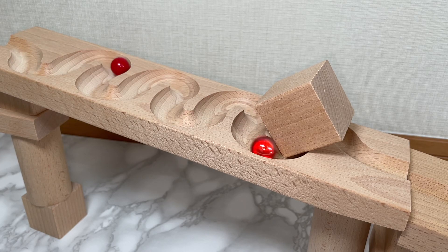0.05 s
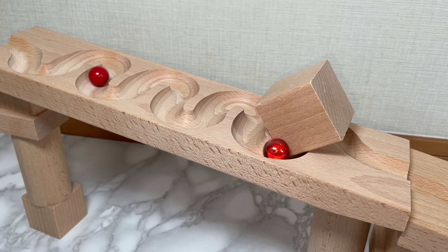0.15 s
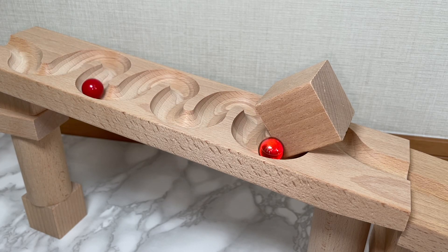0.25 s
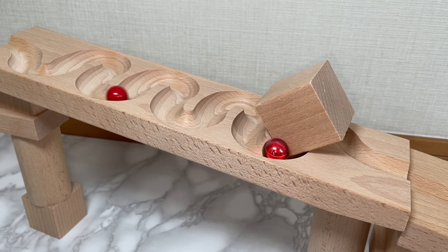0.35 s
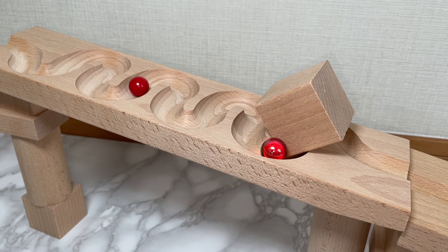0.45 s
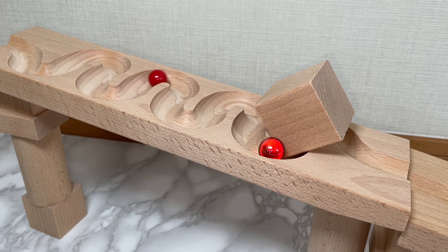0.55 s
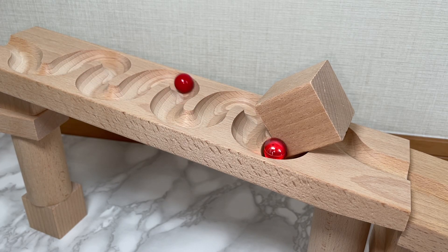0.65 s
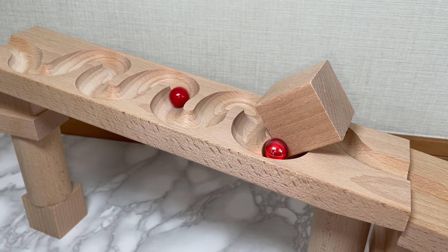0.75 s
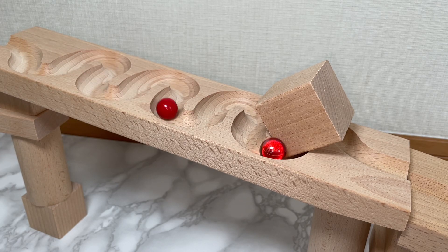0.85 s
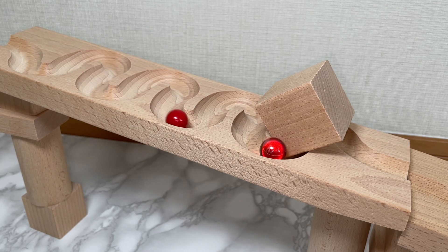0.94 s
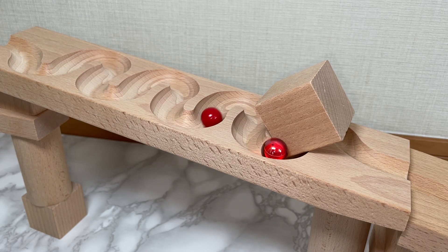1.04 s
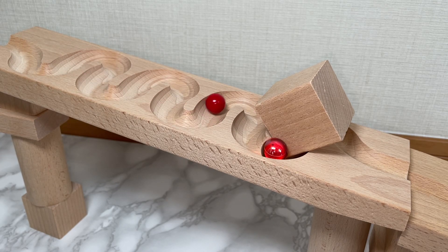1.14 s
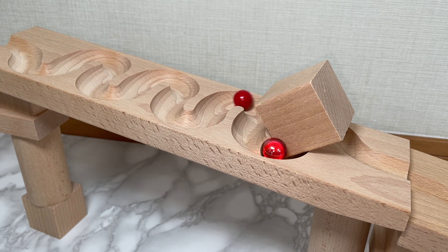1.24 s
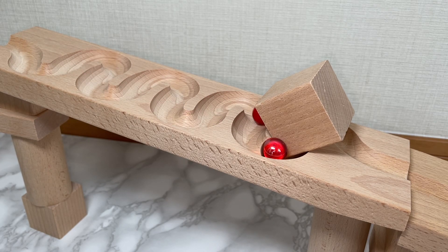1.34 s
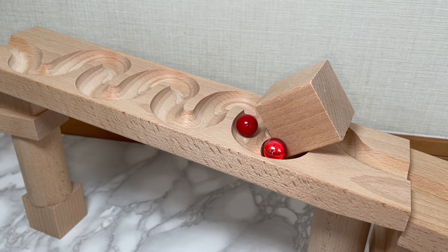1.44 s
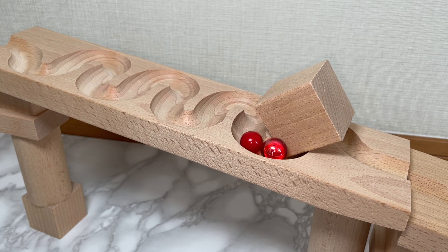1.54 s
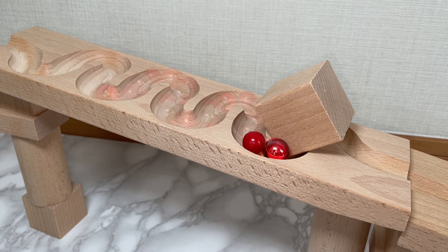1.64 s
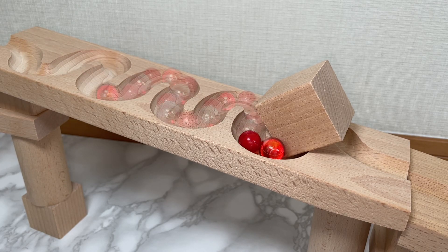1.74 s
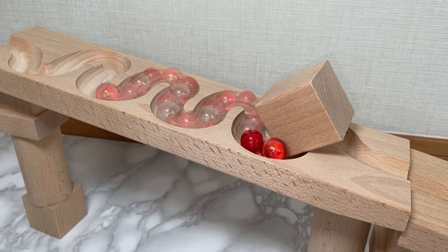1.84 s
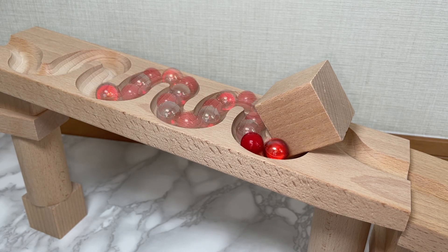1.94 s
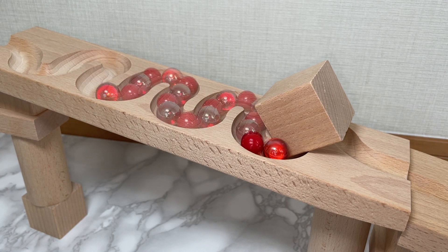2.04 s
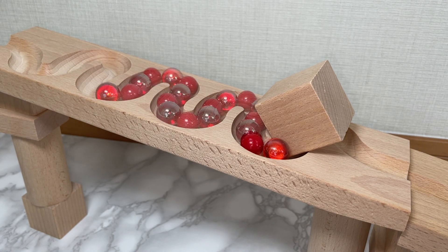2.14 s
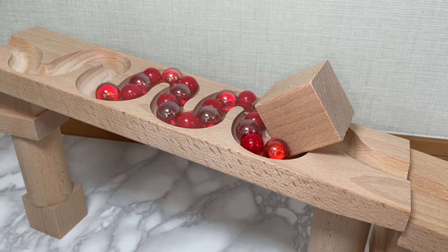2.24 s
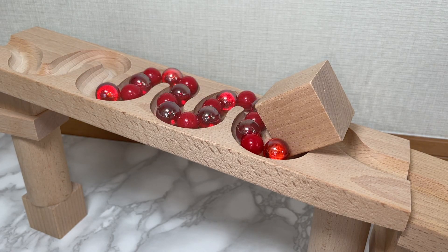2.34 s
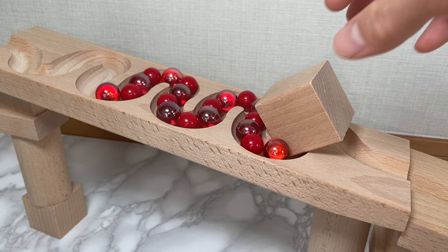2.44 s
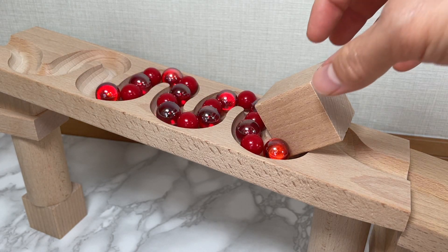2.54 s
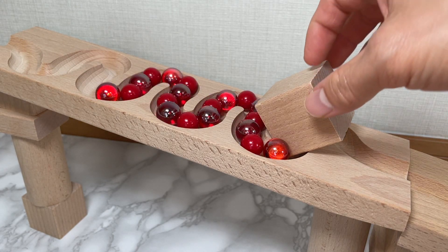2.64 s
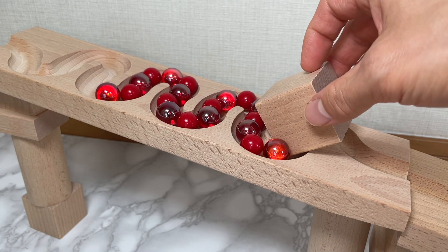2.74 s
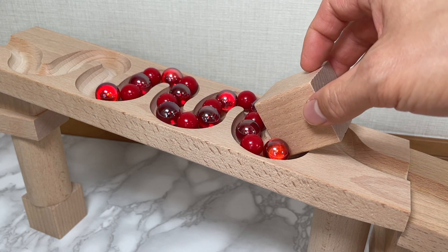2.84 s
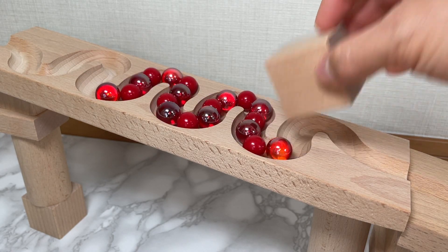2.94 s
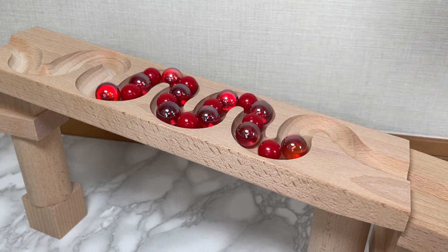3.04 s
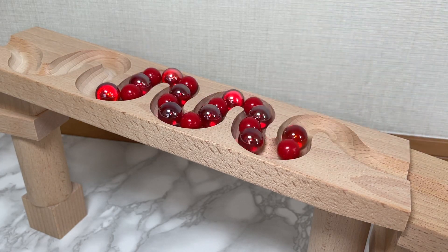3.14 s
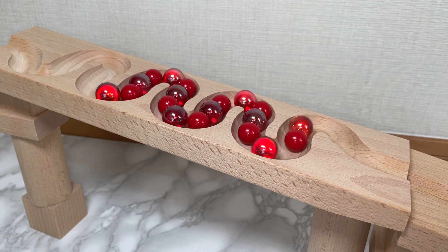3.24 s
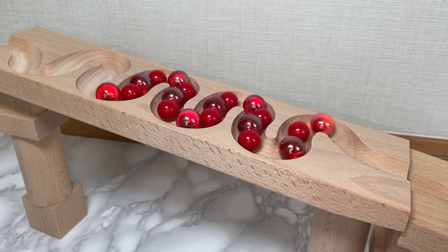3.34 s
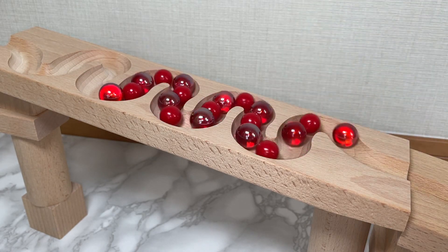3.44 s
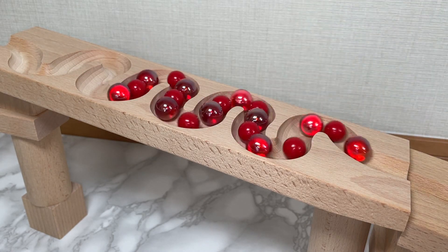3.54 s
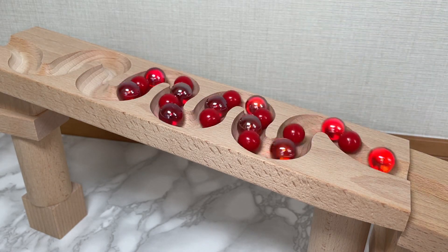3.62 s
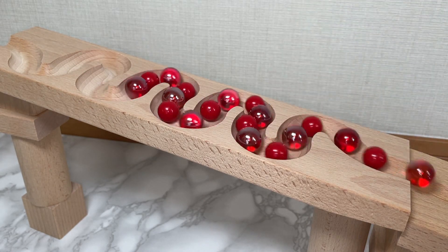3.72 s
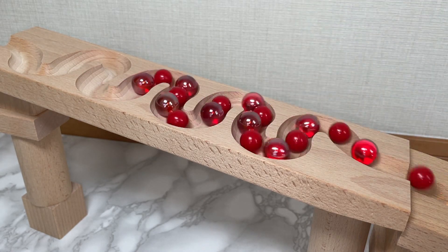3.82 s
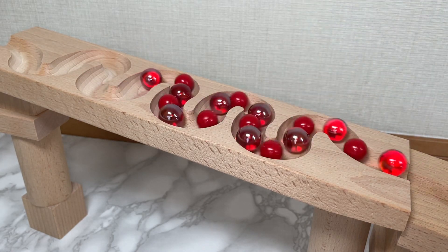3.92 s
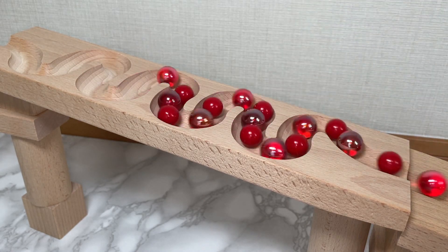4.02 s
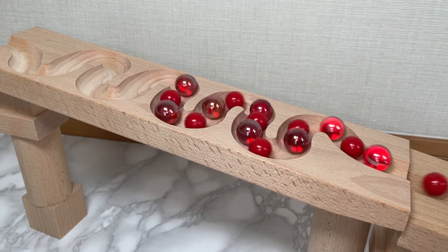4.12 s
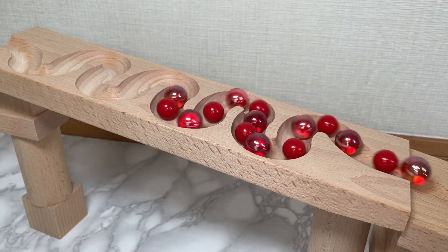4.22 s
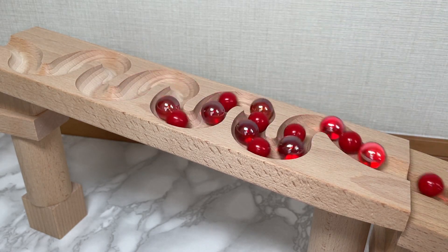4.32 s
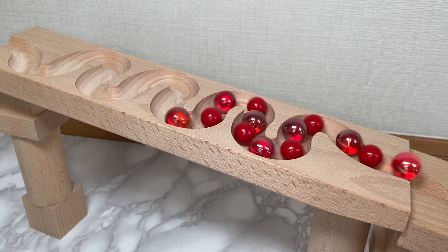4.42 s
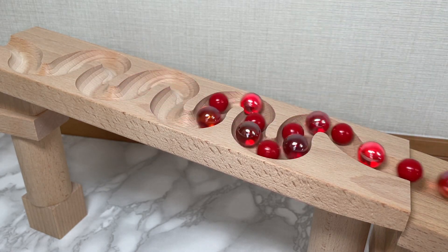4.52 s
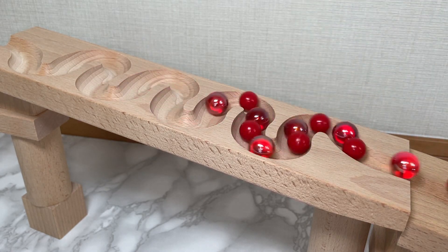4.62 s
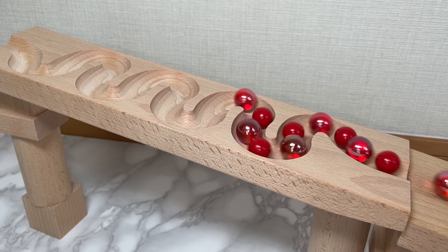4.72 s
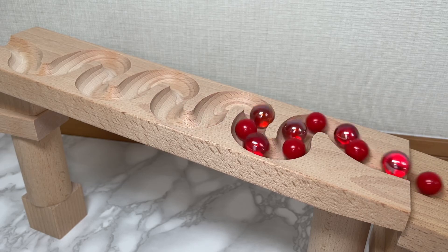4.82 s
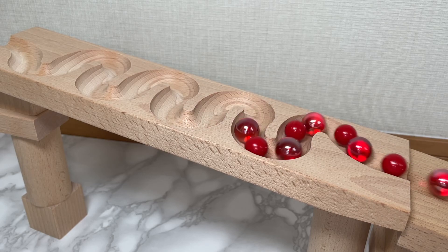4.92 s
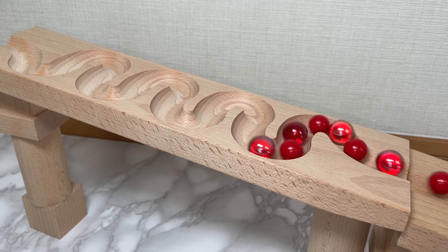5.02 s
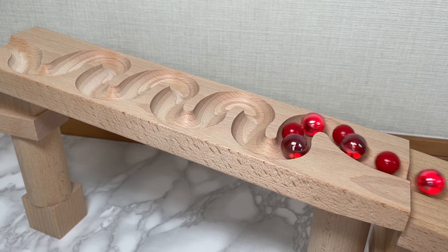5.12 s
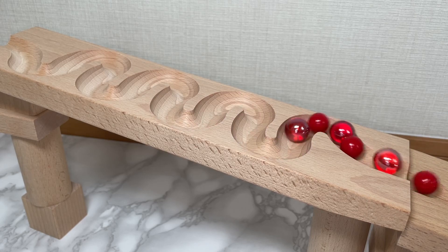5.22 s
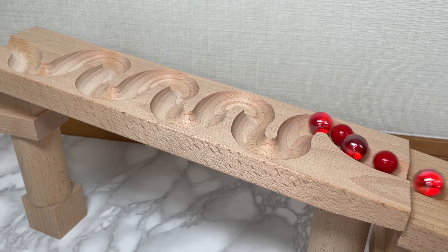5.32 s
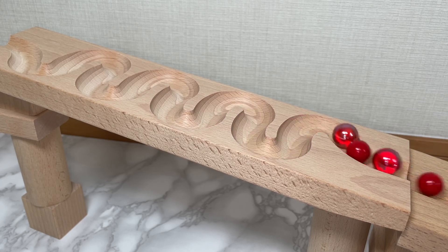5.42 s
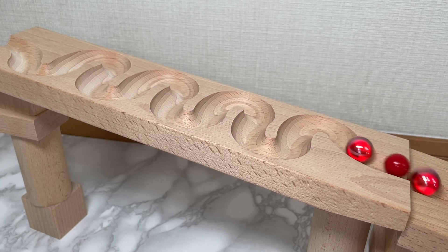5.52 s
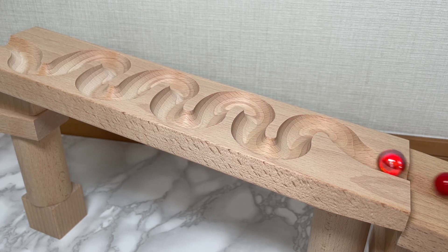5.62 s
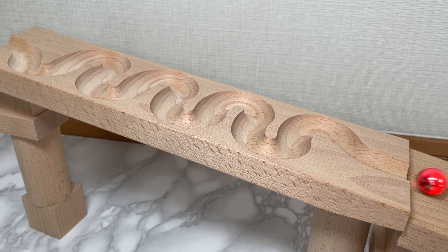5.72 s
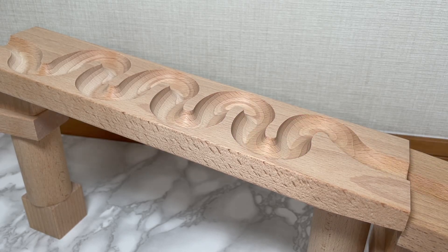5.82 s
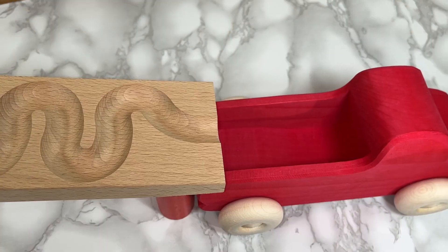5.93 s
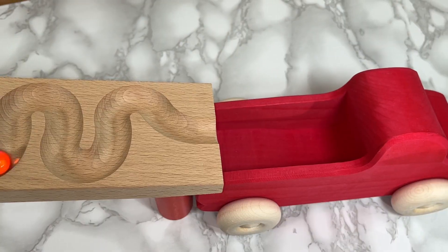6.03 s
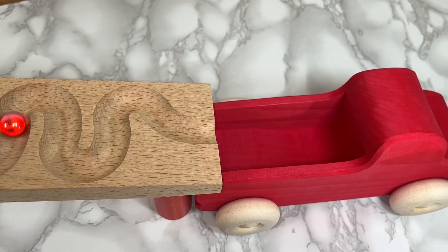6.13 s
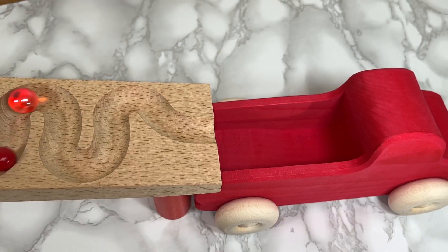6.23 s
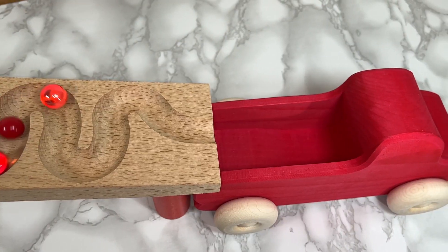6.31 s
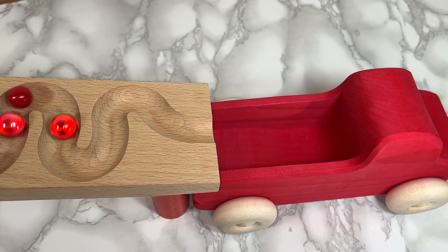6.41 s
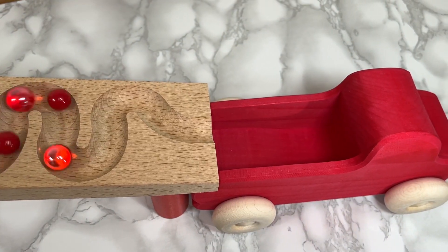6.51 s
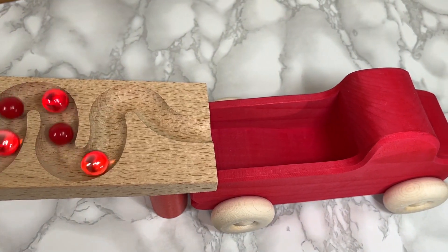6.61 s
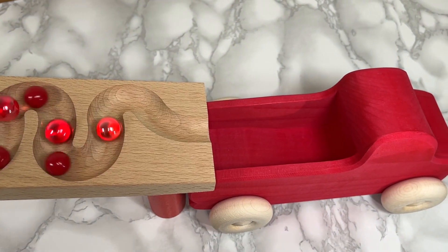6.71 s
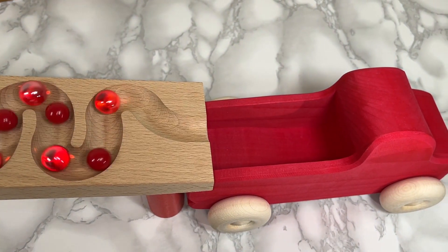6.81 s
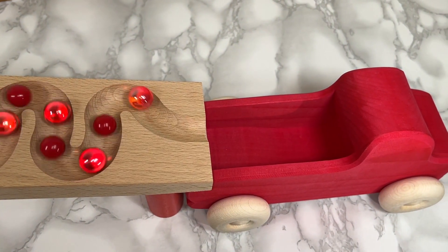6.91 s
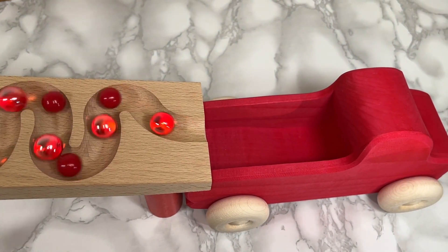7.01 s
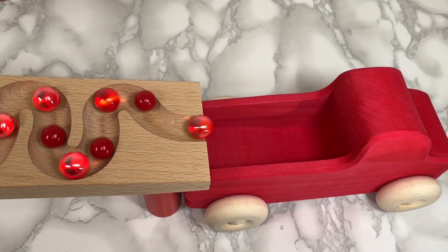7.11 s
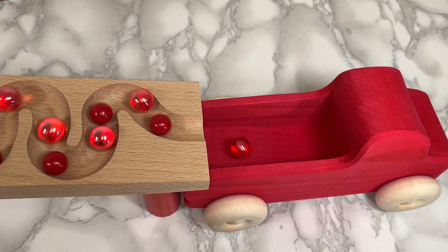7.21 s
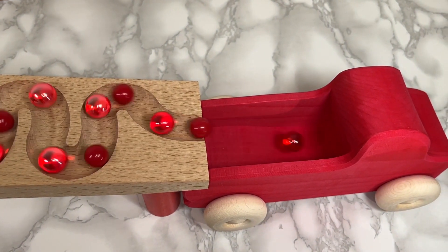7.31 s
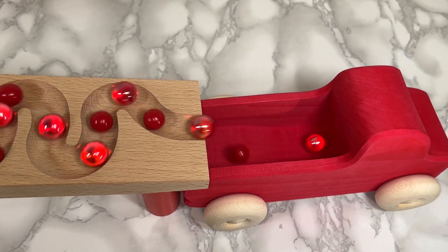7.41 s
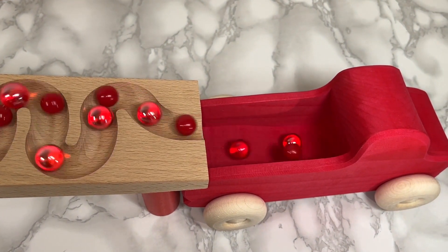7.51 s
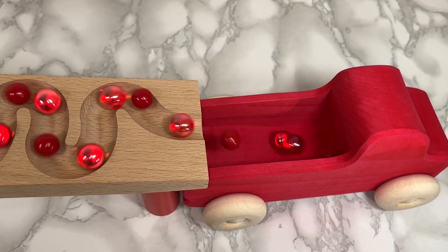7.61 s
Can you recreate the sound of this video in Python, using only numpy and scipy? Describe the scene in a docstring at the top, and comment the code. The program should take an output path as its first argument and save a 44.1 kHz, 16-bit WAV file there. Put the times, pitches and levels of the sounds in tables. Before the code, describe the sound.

A small, quiet room with faint low room tone, heard by a close stereo microphone. From 0 to 1.5 s one glass marble rolls softly down a grooved wooden slope, with a dull light patter and small dry taps, slightly stronger near 0.1 and 1.2 s. At about 1.55-1.65 s it meets another marble with faint glassy clinks, and near silence follows until 3 s, broken only by a tiny tick at 1.9 s. From 3.04 s packed marbles rub and rustle softly with small clicks. At 3.75 s a hard knock begins a far louder stream: woody clacks, rolling drone, table rumble and glass clinks, growing denser through 5-5.8 s, with a sharp glass snap at 5.3 s. From 5.9 s it rattles on the last board, slightly left. From 7.2 s strong, fuller knocks land in a wooden toy truck, continuing to the end around 7.7 s.

```python
"""Glass marbles on a wooden run

Glass marbles roll down a grooved wooden slope: one alone at first, then a released stream of them.
They knock the groove walls, clink together, drop on to lower boards and at last into a wooden toy truck.
Blows are noise bursts and dying sines; rolling is random bumps sent through the tones of the wood.
The table under the boards rumbles; a small quiet room surrounds it all, heard by a close stereo microphone."""
import sys
import numpy as np
from scipy import signal
from scipy.fft import rfft, irfft
from scipy.io import wavfile
from scipy.ndimage import uniform_filter1d

SR = 44100
rng = np.random.default_rng(int(sys.argv[2]) if len(sys.argv) > 2 else 0)


def store_wav(level_fs):
    """Save 16-bit WAV to argv[1]."""
    pcm = np.round(np.clip(np.atleast_2d(level_fs), -1, 1) * 32767)
    wavfile.write(sys.argv[1], SR, pcm.T.astype(np.int16))


N = 337794  # length in samples

RELEASE_S = 3.04  # the block is lifted and the waiting marbles start to move
BOARD_FROM_S, LAST_FROM_S, TRUCK_FROM_S = 3.72, 5.92, 7.2  # the blows move on to the next piece of wood
TRUCK_ROLL_FROM_S = 7.08  # the bright patter moves to the truck a little before the blows


def gain_of(db):
    """Decibels to a factor."""
    return 10 ** (np.asarray(db) / 20)


def evened(x):
    """Scales to rms 1."""
    return x / np.sqrt(np.mean(x ** 2) + 1e-20)


def peaked(x):
    """Scales to peak 1."""
    return x / abs(x).max()


def read(points, hz):
    """Reads a curve between its points, on a log-frequency axis."""
    f, value = np.transpose(points)
    return np.interp(np.log(hz + 1), np.log(f + 1), value)


def coloured(x, spectrum):
    """Filters the last axis by a spectrum and scales to rms 1, so only the shape of the spectrum counts."""
    size = x.shape[-1]
    gain = gain_of(read(spectrum, np.fft.rfftfreq(size, 1 / SR)))
    return evened(irfft(rfft(x) * gain, size))


def wander(span):
    """Slow random curve of rms 1 that changes over span samples."""
    smooth = uniform_filter1d(rng.standard_normal(N), span)
    return evened(uniform_filter1d(smooth, span))


def bumps(per_s, size_db):
    """Sparse random impulses in two channels, a few of them large."""
    size = gain_of(size_db * np.minimum(rng.exponential(1, (2, N)), 3.2))
    present = rng.random((2, N)) < per_s / SR
    return rng.standard_normal((2, N)) * size * present


def ring(modes, t, level_db, phase):
    """Dying sines of a piece of wood, one for each of its modes."""
    hz, db, t60 = np.transpose(modes)[:, :, None]
    level = gain_of(db + level_db - 60 * t / t60)
    return (level * np.sin(2 * np.pi * hz * t + phase)).sum(0)


# how alike left and right are in steady sounds: f/Hz, likeness (0 to 1)
SAME = [(60, 1), (250, 0.78), (700, 0.3)]


def paired(a, b):
    """Two channels from two unrelated signals, alike in the bass."""
    same = np.clip(read(SAME, np.fft.rfftfreq(N, 1 / SR)), 0, 1)
    middle = rfft(a) * np.sqrt((1 + same) / 2)
    side = rfft(b) * np.sqrt((1 - same) / 2)
    return irfft(np.array([middle + side, middle - side]), N)


# colour of the room tone: f/Hz, relative level/dB per Hz
AIR = [(15, -74), (25, 0), (76, 7.5), (293, -19), (677, -12.5), (1070, -25), (6050, -35), (10700, -41),
       (16000, -32)]
AIR_DB = -70  # rms level


def room_tone():
    """Steady noise of the quiet room, strongest in the bass."""
    return gain_of(AIR_DB) * paired(*coloured(rng.standard_normal((2, N)), AIR))


# how long the room echoes: f/Hz, time to fall by 60 dB/s
ROOM = [(300, 0.3), (2000, 0.66), (8000, 0.38), (13000, 0.11)]


def room(x):
    """Sparse taps of random sign, each band dying at its own speed, other taps for each side."""
    taps = np.zeros((2, SR // 2))
    at = np.arange(300, SR // 2 - 20, 20)
    at = at + rng.integers(0, 20, (2, len(at)))
    np.put_along_axis(taps, at, rng.choice([-1., 1.], at.shape), 1)
    hz, t, z = signal.stft(taps, SR, nperseg=256)
    fade = gain_of(-60 * t / read(ROOM, hz)[:, None])
    tail = signal.istft(z * fade, SR, nperseg=256)[1]
    tail = tail / np.linalg.norm(tail[0])
    return signal.fftconvolve(x.mean(0)[None], tail, axes=1)[:, :N]


# colour of the table's rumble: f/Hz, relative level/dB per Hz
RUMBLE = [(30, -60), (75, 1.5), (145, 2.5), (200, -4.5), (300, -10), (450, -18.5), (900, -69)]


def table_rumble(rumble_db, skipping):
    """Low noise of the table under the rolling; it shudders after each strike."""
    noise = paired(*coloured(rng.standard_normal((2, N)), RUMBLE))
    noise = evened(noise * gain_of(1.64 * wander(span=900)))
    return noise * (gain_of(rumble_db) + gain_of(-24.5) * skipping)


# colour of packed marbles rubbing: f/Hz, relative level/dB per Hz
RUSTLE = [(2000, -9), (6000, -7), (11000, -10), (14000, -27)]
RUSTLE_DB = -75  # rms level before it swells and ebbs


def rustle():
    """Packed marbles rub from the release until the stream reaches the board: soft hiss that wavers."""
    t = np.arange(N) / SR
    rubbing = np.clip((t - RELEASE_S) / 0.21, 0, 1) * (t < BOARD_FROM_S)
    rubbing = rubbing * gain_of(4.7 * wander(span=3000))
    return gain_of(RUSTLE_DB) * coloured(rng.standard_normal((2, N)), RUSTLE) * rubbing


# the plank under the marbles sings: t/s, f/Hz
HUM = [(3.742, 1780), (3.8, 1686), (5.901, 1680), (5.954, 1594)]


def hum():
    """Dense rolling keeps one plank mode sounding: a tone whose strength and phase drift quickly."""
    turns = np.cumsum(np.interp(np.arange(N) / SR, *np.transpose(HUM))) / SR
    tones = []
    for side in (0, 1):
        drift = wander(span=260) + 1j * wander(span=260)
        tones.append((drift * np.exp(2j * np.pi * turns)).real)
    return paired(*tones) * gain_of(4.3 * wander(span=3000))


def patter(modes, start_s, end_s, damping, per_s, size_db, lively_db):
    """Each small bump rings all modes at once; each mode comes and goes as the marbles pass its lively spots."""
    t = np.arange(N) / SR
    soft = np.minimum(t[:4000] / 0.00077, 1) ** 2  # a rolling contact presses gently
    on = slice(max(round(start_s * SR), 0), round(end_s * SR))
    contacts, rung = bumps(per_s, size_db), np.zeros((2, N))
    for hz, db, t60 in modes:
        lively = (contacts * gain_of(lively_db * wander(span=2500)))[:, on]
        # damping below 1 shortens the ring
        mode = ring([(hz, db, t60 * damping)], t[:4000], 0, 0)[None] * soft
        rung[:, on] += signal.oaconvolve(lively, mode)[:, :lively.shape[1]]
    rung /= np.sqrt(np.mean(rung[:, on] ** 2))
    return paired(*rung) * np.clip(np.minimum(t - start_s, end_s - t) / 0.0078, 0, 1)


# dull drone of glass on wood grain: f/Hz, relative level/dB per Hz
PATTER = [(200, -12), (400, -2), (680, 8.5), (1100, 3), (1500, -8), (2800, -19), (6500, -55)]
# low modes of the frame: f/Hz, relative level/dB, undamped time to fall by 60 dB/s
FRAME = [(151.5, 7.5, 0.21), (196.2, 5, 0.19), (568, 2.5, 0.12), (645, 3, 0.15), (721.3, 0, 0.24),
         (1005, -2.5, .1)]
LIVELY_DB = -35  # drone level around which the patter and the singing grow faster
PATTER_SLOPE, HUM_SLOPE = 2.25, 1.27  # dB of patter or of singing for each dB of drone


def drone(drone_db):
    """Dull noise of glass on wood grain, with the singing plank and the low modes of the frame."""
    t = np.arange(N) / SR
    sound = paired(*coloured(bumps(2200, 2.3), PATTER))
    # the drone level is applied below, so only the extra growth is added here
    hum_db = -1.5 + (HUM_SLOPE - 1) * (drone_db - LIVELY_DB)
    sound += gain_of(hum_db) * hum() * np.clip((TRUCK_FROM_S - t) / 0.56, 0, 1)
    sound += gain_of(-3.5) * patter(FRAME, -1, 9, damping=0.9, per_s=1500, size_db=2.4, lively_db=3.4)
    return sound * gain_of(drone_db + 1.84 * wander(span=700))


# Modes of each piece of wood, both rolled on and struck.
# Columns: f/Hz, relative level/dB, time to fall by 60 dB/s when struck (rolling shortens it)
SLOPE = [(1200, -5, 0.07), (1788, -14, 0.39), (2523, 2, 0.039), (2790, -6, 0.023), (3470, -8, 0.081),
         (4840, -16, 0.087), (5420, -12, 0.066)]
BOARD = [(1070, -17, 0.046), (1674, 5.5, 0.032), (2347, 3.5, 0.022), (3103, 1.5, 0.094), (3244, 9.5, 0.019),
         (3867, 13.5, 0.022), (4700, 5.5, 0.038), (5253, 10.5, 0.019)]
LAST_BOARD = [(1655, -3.5, 0.056), (2686, 6, 0.023), (3190, 4.5, 0.036), (3580, 4.5, 0.02),
              (3930, 4.5, 0.022), (4270, -5, 0.035), (4690, 13.5, 0.012), (5250, -4.5, 0.061)]
TRUCK = [(1140, 6, 0.021), (2096, 3, 0.025), (2726, -1, 0.044), (3537, 12, 0.017), (3700, -1.5, 0.028),
         (4300, -2.5, 0.034), (4800, -1, 0.022)]


def wood_patter():
    """Bright patter of whichever piece of wood carries the marbles: bumps ring its modes."""
    wood = gain_of(8.5) * patter(SLOPE, -1, RELEASE_S, 0.42, 700, 3.3, 4.7)
    # many marbles deaden the slope
    wood += gain_of(4.5) * patter(SLOPE, RELEASE_S, BOARD_FROM_S + 0.18, 0.17, 1200, 4.0, 3.3)
    wood += gain_of(3.5) * patter(BOARD, BOARD_FROM_S, LAST_FROM_S, 0.14, 800, 4.9, 5.6)
    wood += gain_of(3.0) * patter(LAST_BOARD, LAST_FROM_S, TRUCK_ROLL_FROM_S, 0.45, 800, 3.3, 2.7)
    wood += gain_of(-2.0) * patter(TRUCK, TRUCK_ROLL_FROM_S, 9, 0.18, 830, 4.1, 5.1)
    return wood


# colour of glass on glass, also for ticks and knocks: f/Hz, relative level/dB
CLINK = [(3000, 8.5), (6000, 17.5), (8000, 11.5), (10500, 10.5), (12500, -8), (16500, -36)]


def chatter():
    """Glass chatter in the released stream: dense bumps with the colour of clinking glass."""
    grit = coloured(bumps(3000, 4.5), CLINK)
    return gain_of(-17.0) * grit * (np.arange(N) / SR > RELEASE_S)


# a struck marble skittering over the grain: f/Hz, relative level/dB per Hz
SKITTER = [(700, -12), (2600, -5), (4500, -11.5), (8000, -45)]


def skitter(skipping):
    """Struck marbles skip over the grain: random bumps that follow the strength of recent blows."""
    return gain_of(-9.5) * paired(*coloured(bumps(1500, 4.9), SKITTER)) * skipping


# course of the rolling: t/s, drone level/dB, table rumble level/dB (before random wavering and blows)
ROLLING = [(0, -56, -56), (.085, -57.5, -56), (.1, -48.5, -44), (.18, -63, -55), (.3, -58.5, -60),
           (.44, -58, -59), (.75, -59.5, -58.5), (.88, -65.5, -58.5), (.95, -56, -61), (1.6, -63, -59.5),
           (1.719, -83, -67.5), (1.85, -111, -77), (2.62, -85, -74), (2.7, -91, -65), (2.99, -80, -68),
           (3.06, -67.5, -54.5), (3.12, -60, -62), (3.25, -70, -55), (3.3, -54, -57), (3.74, -50, -44.5),
           (3.799, -44.5, -41), (4.7, -42, -38), (5.852, -40.5, -40), (5.95, -38, -41.5),
           (7.049, -39.5, -44), (7.66, -42, -52)]


def rolling(hits):
    """All rolling sounds follow one course; each blow stirs the patter, rumble and skitter for a moment."""
    s, *levels = np.transpose(ROLLING)
    t = np.arange(N) / SR
    drone_db, rumble_db = (np.interp(t, s, db) for db in levels)
    patter_db = LIVELY_DB + PATTER_SLOPE * (drone_db - LIVELY_DB)
    # power of recent blows, falling tenfold every 0.04 s
    fade = gain_of(-20 * t[:SR // 2] / 0.04)
    recent = signal.oaconvolve((hits ** 2).mean(0), fade / fade.sum())[:N]
    skipping = np.sqrt(abs(recent))
    bright = (wood_patter() + chatter()) * (gain_of(patter_db) + gain_of(-14.5) * skipping)
    return table_rumble(rumble_db, skipping) + rustle() + drone(drone_db) + bright + skitter(skipping)


# small glass-on-glass ticks in the stream: t/s, peak level/dB
TICKS = [(1.923, -50), (3.405, -54), (3.512, -43), (3.5364, -42), (3.643, -29.5), (3.847, -21.5),
         (3.8907, -31), (4.08, -28), (4.142, -34.5), (4.221, -34), (4.2572, -39), (4.6462, -25),
         (4.775, -26), (4.888, -19), (5.2605, -18), (5.765, -34), (6.0152, -20), (6.216, -21), (6.718, -19),
         (6.749, -17.5), (7.6158, -22)]


def ticks():
    """Marbles touching in the stream: a bare clink of glass, a short burst of dying noise."""
    out, t = np.zeros(N), np.arange(1000) / SR
    for s, db in TICKS:
        at = round(s * SR)
        clink = coloured(rng.standard_normal(len(t)), CLINK) * gain_of(-60 * t / 0.016)
        out[at:at + len(t)] += gain_of(db) * peaked(clink)
    return out


# marbles meeting head on: t/s, peak level/dB
SNAPS = [(4.9078, -17), (5.3144, -7.5), (5.4313, -33), (5.53, -22), (6.2698, -21), (6.386, -38),
         (6.9337, -23), (7.6206, -19)]
# colour of that click: f/Hz, relative level/dB
SNAP = [(6000, -44), (9000, -4.5), (11000, -2.5), (13000, -10), (16500, -9)]
SNAP_S = 0.0015  # the click swells until this moment, then dies


def snaps():
    """A head-on contact of glass: a bright click of noise, a few milliseconds long."""
    out, t = np.zeros(N), np.arange(600) / SR
    for s, db in SNAPS:
        at = round(s * SR)
        click = coloured(rng.standard_normal(len(t)), SNAP) * t * np.exp(-t / SNAP_S)
        out[at:at + len(t)] += gain_of(db) * peaked(click)
    return out


# low modes of the frame under a blow: f/Hz, relative level/dB, time to fall by 60 dB/s
LEGS = [(134, -11, 0.076), (269, -3, 0.17), (442, -2.5, 0.068)]
# the thud is fullest for spots near this pitch, and weaker with glass on glass
SQUARE_HZ, THUD_DB_PER_OCTAVE, THUD_GLASS_DB = 2254, -15, -19.5


def knocks(rows, modes, ring_db, burst_s, spread_db, pan_db, boom_db, square_db):
    """Each blow: a short tock of the struck spot, a thud, a clink of glass, and the modes nearest in pitch."""
    out, t = np.zeros((2, N + SR)), np.arange(SR // 5) / SR
    mode_hz = np.transpose(modes)[0][:, None]
    rise = np.sin(np.pi / 2 * np.minimum(t / 0.00056, 1)) ** 2  # bending waves take a moment to reach the air
    burst = np.exp(-(t / burst_s - 1) ** 2 / 2)  # the wave packet from the struck spot passes in milliseconds
    boom = rise * ring(LEGS, t, 0, 0)  # the whole frame answers the thud
    for s, db, hz, clink_db in rows:
        chance, hiss = rng.random((3, len(modes), 1)), rng.standard_normal((4, len(t)))
        band = signal.butter(2, [0.78 * hz, 1.23 * hz], "band", fs=SR, output="sos")
        rough = signal.sosfilt(band, (hiss[0] + .5 * hiss[1:3]) * burst)
        tock = burst * np.sin(2 * np.pi * hz * t) + 1.1 * peaked(rough)
        # modes far in pitch from the struck spot ring less
        near_db = ring_db - 5.25 * abs(np.log2(mode_hz / hz)) + spread_db * (chance[0] - .5)
        # each mode radiates its own way, so it reaches the two sides out of step
        phases = [2 * np.pi * chance[1] + side * 1.81 * (chance[2] - .5) for side in (1, -1)]
        rung = [ring(modes, t, near_db, phase) for phase in phases]
        wood = peaked(rise * (tock + rung)) * gain_of([[pan_db / 2], [-pan_db / 2]])
        turns = 1150 * (0.795 + 0.48 * chance[0, 0]) * t + np.array([[.08], [-.08]])
        thud = peaked(rise * gain_of(-60 * t / 0.015) * np.sin(2 * np.pi * turns))
        clink = peaked(coloured(hiss[3], CLINK) * gain_of(-60 * t / 0.023))
        glass = min(gain_of(clink_db), .97)
        thud_db = square_db + THUD_DB_PER_OCTAVE * abs(np.log2(hz / SQUARE_HZ)) + THUD_GLASS_DB * glass
        blow = np.sqrt(1 - glass ** 2) * wood + glass * clink  # more glass leaves less wood
        blow = blow + gain_of(thud_db) * (thud + gain_of(boom_db) * boom)
        at = round(s * SR)
        out[:, at:at + len(t)] += gain_of(db) * blow
    return out[:, :N]


# knocks of a marble: t/s, blow level/dB, pitch of the struck spot f/Hz,
# glass clink level/dB relative to the blow (limited to just under 0)
KNOCKS = [(0.059, -52, 2480, -39), (0.0892, -30, 2340, -43), (0.224, -51, 2540, -35),
          (0.304, -48.5, 2500, -45), (0.334, -48.5, 2460, -33), (0.4637, -39, 2790, -46),
          (0.4725, -36.5, 2560, -58), (.55, -49, 2880, -60), (0.6194, -46, 2520, -32),
          (0.648, -41, 2590, -34), (0.669, -46, 1210, -40), (0.7398, -51, 2570, -42), (0.9, -44, 2510, -35),
          (0.995, -43.5, 2560, -35), (1.014, -43.5, 1880, -33), (1.109, -44.5, 2550, -35),
          (1.167, -31, 2640, -45), (1.1877, -37, 2540, -37), (1.293, -37, 2550, -62),
          (1.5516, -35, 2600, -0.5), (1.6095, -36, 2740, 2), (1.6523, -49.5, 3700, -1.5),
          (3.1735, -44.5, 3240, 0.5), (3.283, -46, 1830, -50), (3.343, -38.5, 2360, -13),
          (3.357, -41.5, 2420, -35), (3.376, -46, 2420, -45), (3.58, -40, 2350, -45),
          (3.49, -40.5, 3900, -1), (3.5644, -40, 3620, -3), (3.6142, -32.5, 2440, -0.5),
          (3.6297, -36, 4920, -22), (3.664, -34.5, 2480, 3), (3.767, -6, 1686, -19),
          (3.786, -17, 3650, -36), (3.8584, -18.5, 3880, -18), (3.9082, -10.5, 3610, -26),
          (4.008, -14, 3990, -10.5), (4.022, -19.5, 3700, -33), (4.0294, -17, 1610, -11),
          (4.0443, -13.5, 1760, -27), (4.1261, -18, 3590, -42), (4.2776, -5, 3860, -19),
          (4.2932, -11.5, 3240, -35), (4.325, -19, 2820, -4), (4.354, -18.5, 4420, -14),
          (4.5, -4.5, 4000, -20), (4.5101, -15.5, 2500, -45), (4.7053, -3.5, 3800, -17),
          (4.7185, -12, 2870, -29), (4.806, -4, 3980, -16.5), (4.842, -13.5, 3920, -11.5),
          (4.925, -4, 3380, -38), (4.9599, -12.5, 3010, -15), (4.9871, -11.5, 3320, -10),
          (4.9965, -15, 3100, -24), (5.0263, -11.5, 3850, -17), (5.049, -10.5, 3300, -12),
          (5.0608, -15, 4900, -4), (5.094, -16, 3800, -36), (5.114, -20.5, 3800, -36),
          (5.1424, -5.5, 4070, -27), (5.1612, -7.5, 3100, -9), (5.17, -11, 1720, -2),
          (5.2492, -10.5, 4640, -8), (5.2873, -5, 3840, -29), (5.3159, -4, 2190, -12.5),
          (5.3495, -6.5, 4600, -13), (5.433, -4, 4300, -8.5), (5.532, -3, 2690, -11.5),
          (5.5561, -7, 4340, -6.5), (5.5677, -8.5, 3900, -5), (5.6522, -5.5, 2550, -9.5),
          (5.6965, -11, 3900, -51), (5.708, -13.5, 1860, -8.5), (5.736, -10.5, 2470, -18),
          (5.7406, -8, 3600, -15), (5.764, -11.5, 2830, -11), (5.7958, -16.5, 4180, 0),
          (5.891, -4, 3650, -48), (5.901, -14.5, 3700, -30), (5.94, -12.5, 3000, -10.5),
          (5.979, -13.5, 4830, -10), (6.0041, -10.5, 4540, -16), (6.097, -8.5, 2820, -14),
          (6.116, -7.5, 4690, -7), (6.203, -12, 2740, -2), (6.2408, -11.5, 2730, -14),
          (6.25, -14, 2600, -14), (6.27, -4, 3410, -3), (6.3028, -7, 2710, -10.5), (6.3869, -5.5, 3930, -4),
          (6.484, -4.5, 3774, -6.5), (6.5093, -5.5, 2670, -4.5), (6.6053, -5.5, 4180, -9),
          (6.658, -11.5, 2640, -12), (6.694, -7, 2940, -13), (6.843, -9.5, 2650, -19),
          (6.8561, -18, 2630, -22), (6.936, -18, 1650, 0), (7.0793, -2.5, 3970, -6),
          (7.2278, -15.5, 4870, -33), (7.233, 0, 2830, -38), (7.262, -6, 3970, -6.5), (7.287, -23, 3850, 0),
          (7.35, -1, 3505, -37), (7.3622, -8, 3260, -9.5), (7.3934, -12, 3700, -7),
          (7.4183, -13.5, 3950, -25), (7.432, -19, 2650, -23), (7.4347, -4, 2730, -13.5),
          (7.528, 0.5, 2707, -16.5), (7.5675, -8, 3580, -36), (7.6217, -18, 3560, -9),
          (7.6565, -4, 3440, -3.5)]


def all_knocks():
    """Each knock sounds the wood under the marble at that time: slope, board, last board, then truck."""
    edges = (0, BOARD_FROM_S, LAST_FROM_S, TRUCK_FROM_S, N / SR)
    slope, board, last, truck = ([row for row in KNOCKS if a <= row[0] < b]
                                 for a, b in zip(edges, edges[1:]))
    hits = knocks(slope, SLOPE, ring_db=-7.0, burst_s=0.0019, spread_db=1.9,
                  pan_db=3.4, boom_db=-14.0, square_db=0.34)
    hits = hits + knocks(board, BOARD, ring_db=-5.0, burst_s=0.0013, spread_db=7.0,
                         pan_db=1.9, boom_db=-17.5, square_db=-2.5)
    # the last board is heard more from the left
    hits = hits + knocks(last, LAST_BOARD, ring_db=-7.0, burst_s=0.0016, spread_db=13.4,
                         pan_db=6.2, boom_db=-14.5, square_db=-4.5)
    return hits + knocks(truck, TRUCK, ring_db=-0.44, burst_s=0.0027, spread_db=12.3,
                         pan_db=2.1, boom_db=-29.0, square_db=-2)


def scene():
    """Room tone, rolling, and all blows of the marbles with their echo in the room."""
    hits = all_knocks() + ticks() + snaps()
    wet = gain_of(-10.5) * room(hits)
    return room_tone() + rolling(hits) + wet + hits


RIGHT_LATE_S = 2.5e-5  # the right port of the microphone lies a little farther from the marbles
EDGE_HZ = 16600  # upper limit of the recorder


def record(dry):
    """The right port hears late; the loudest blows are clipped over a knee; then the recorder's band limit."""
    late = np.exp(-2j * np.pi * np.fft.rfftfreq(2 * N, 1 / SR) * np.array([[0], [RIGHT_LATE_S]]))
    heard = irfft(rfft(dry, 2 * N) * late)[:, :N]
    clipped = heard / (1 + (abs(heard) / .93) ** 6) ** (1 / 6)
    lowpass = signal.firwin(1023, EDGE_HZ, window=("kaiser", 9), fs=SR)
    return signal.oaconvolve(clipped, lowpass[None], "same")


dry = scene()
out = record(dry)
store_wav(out)
```